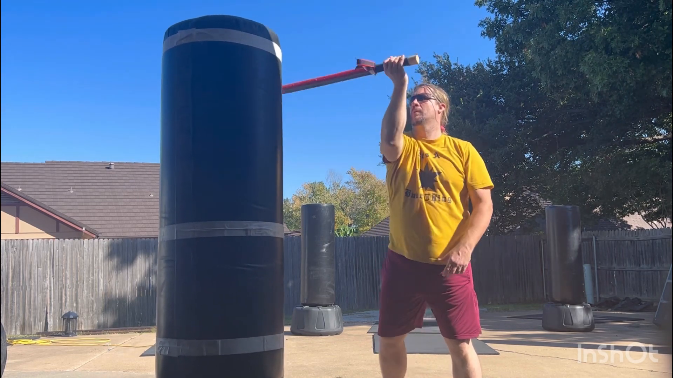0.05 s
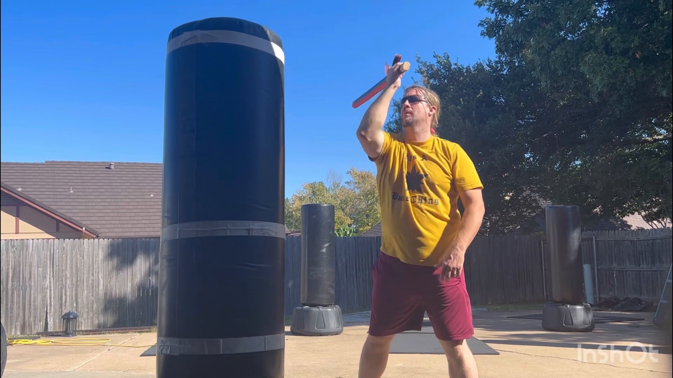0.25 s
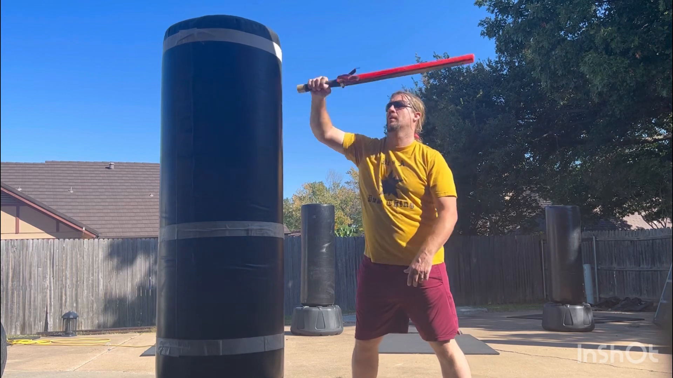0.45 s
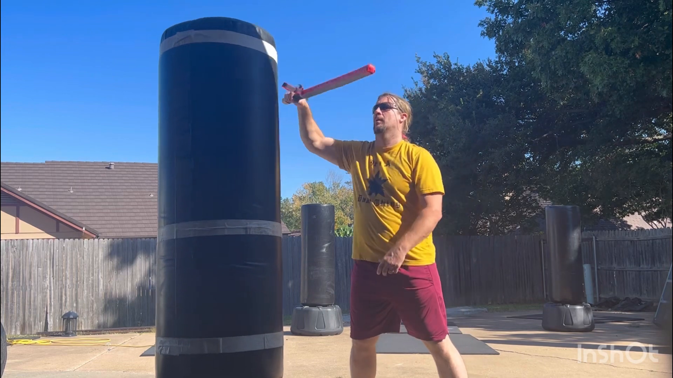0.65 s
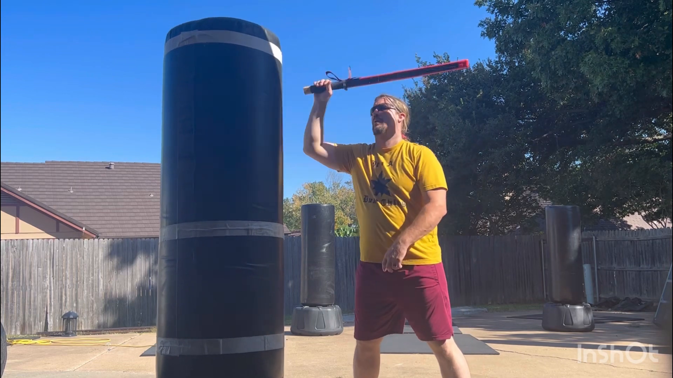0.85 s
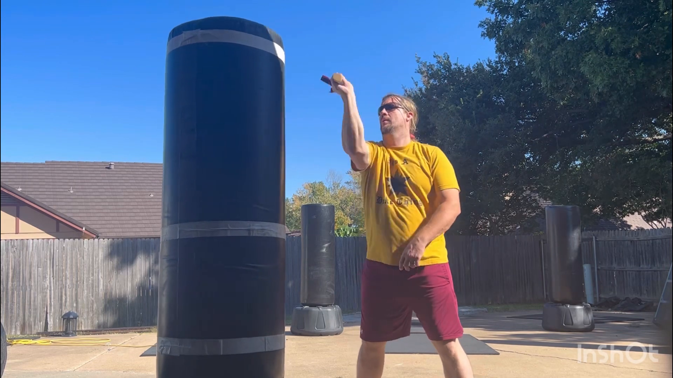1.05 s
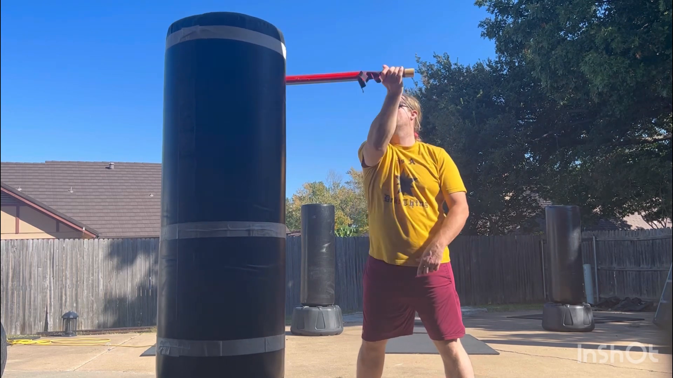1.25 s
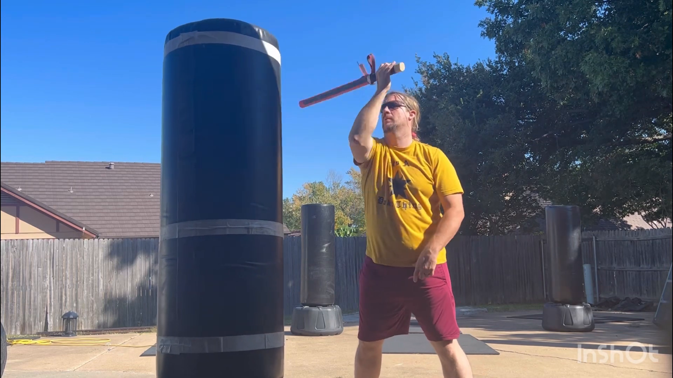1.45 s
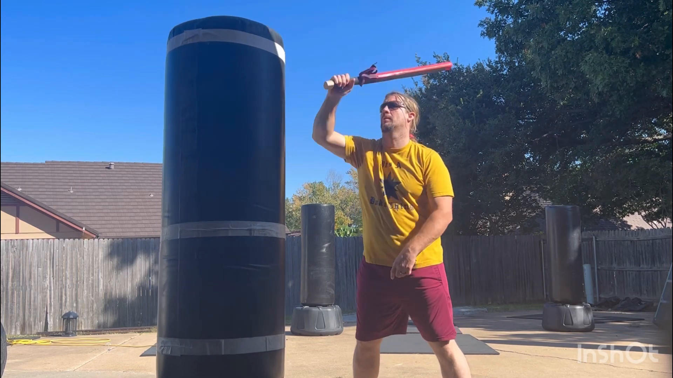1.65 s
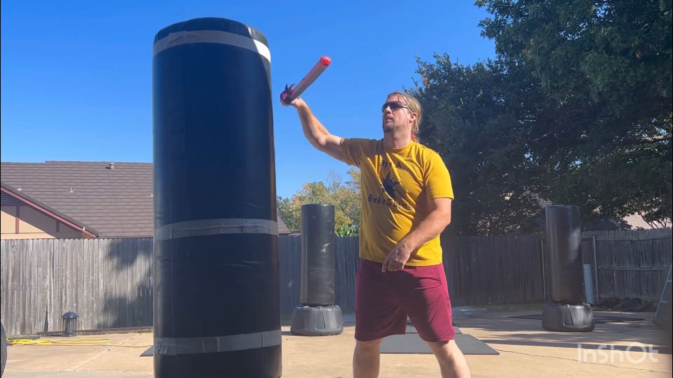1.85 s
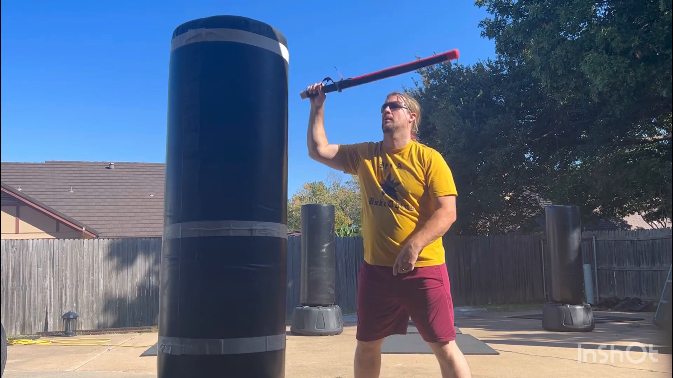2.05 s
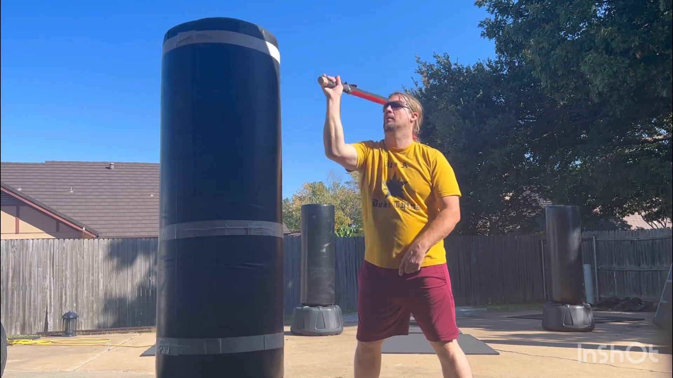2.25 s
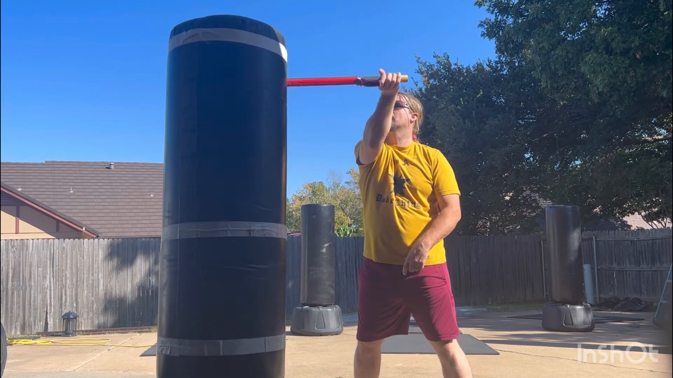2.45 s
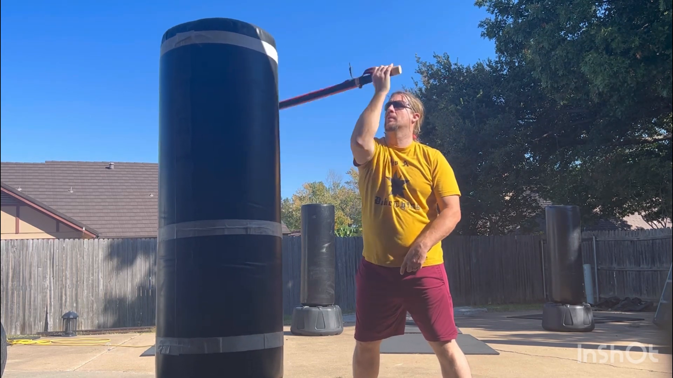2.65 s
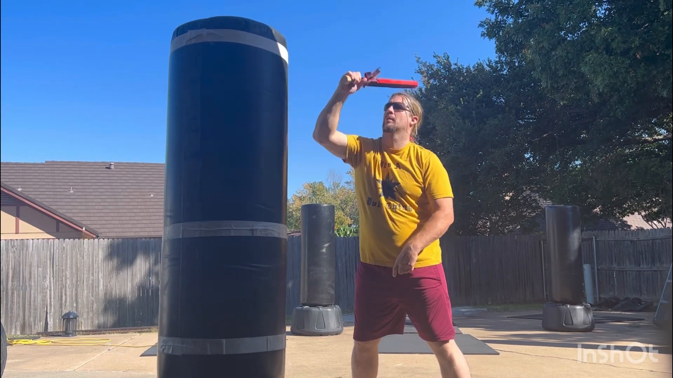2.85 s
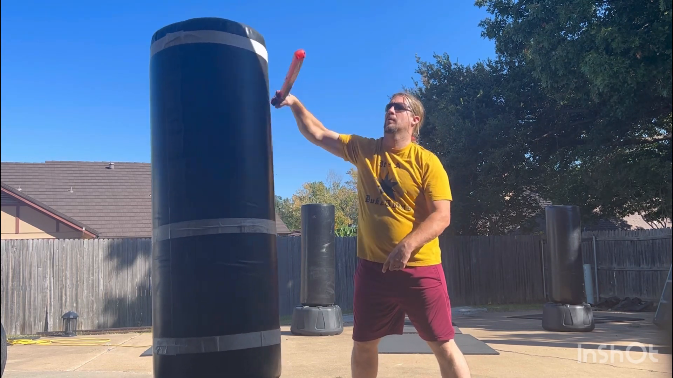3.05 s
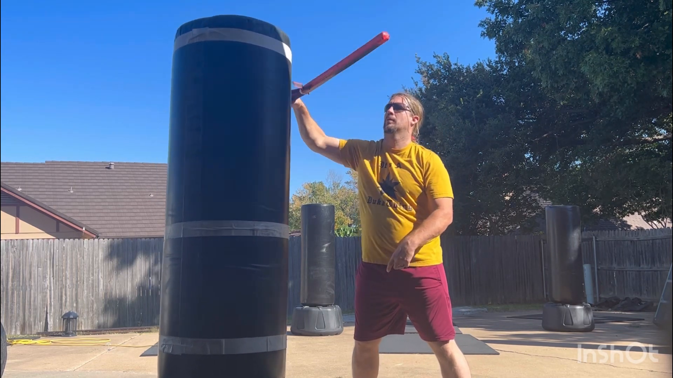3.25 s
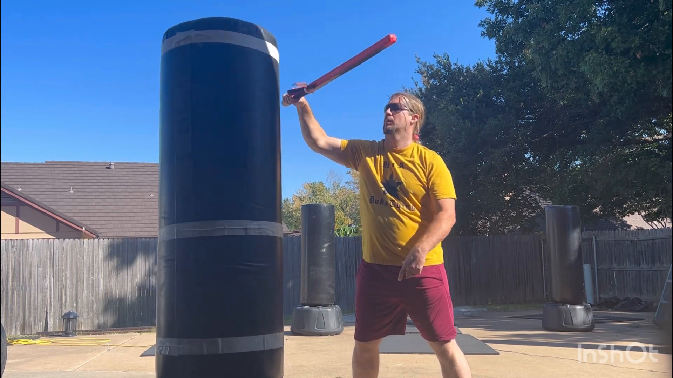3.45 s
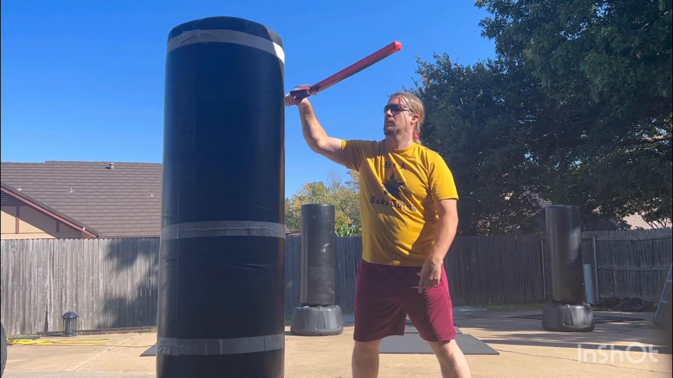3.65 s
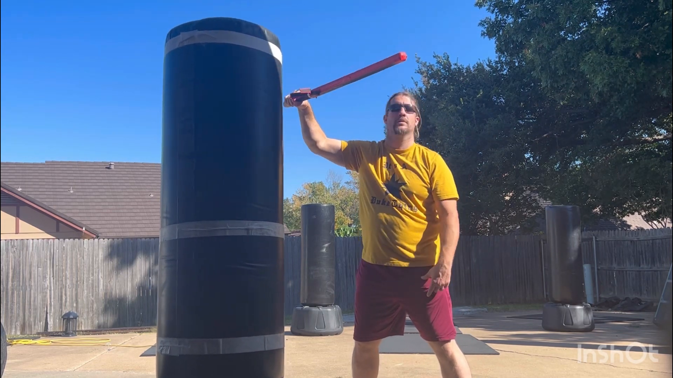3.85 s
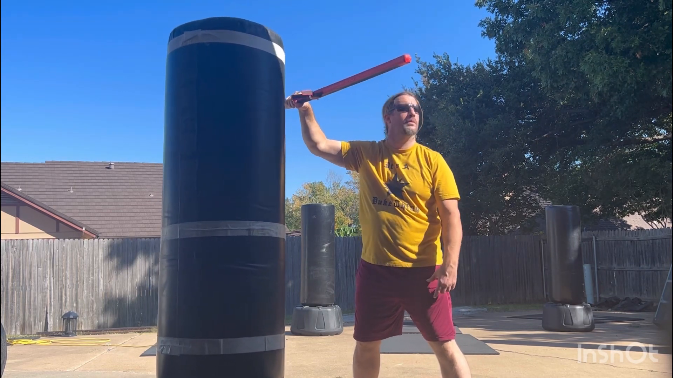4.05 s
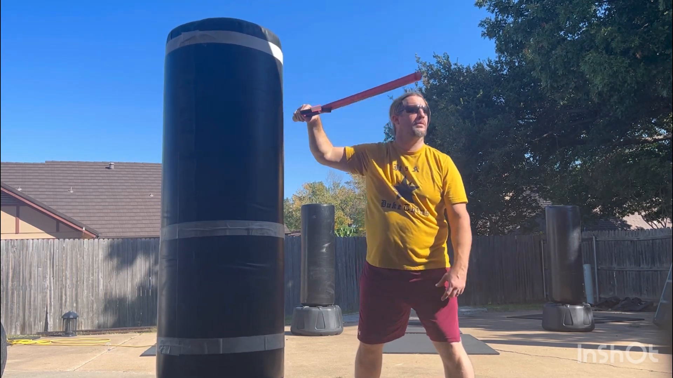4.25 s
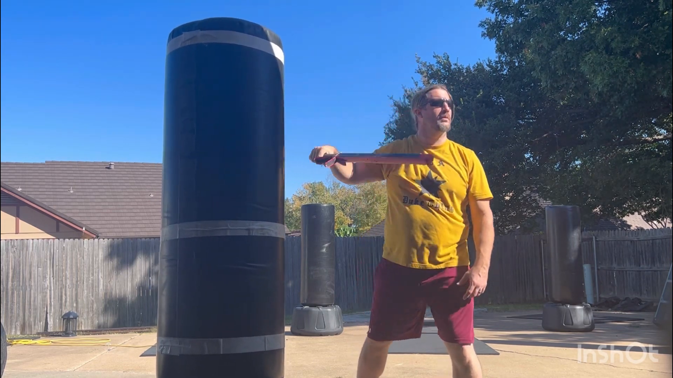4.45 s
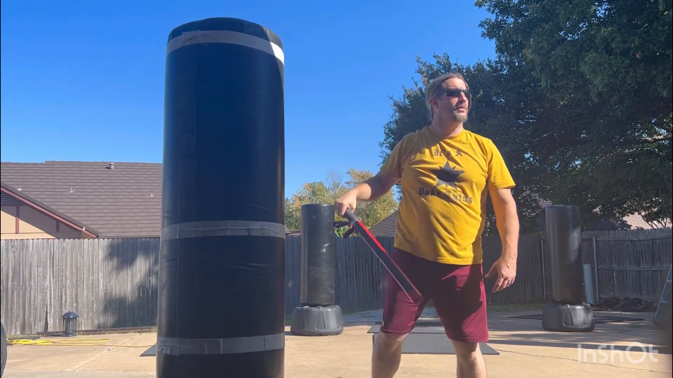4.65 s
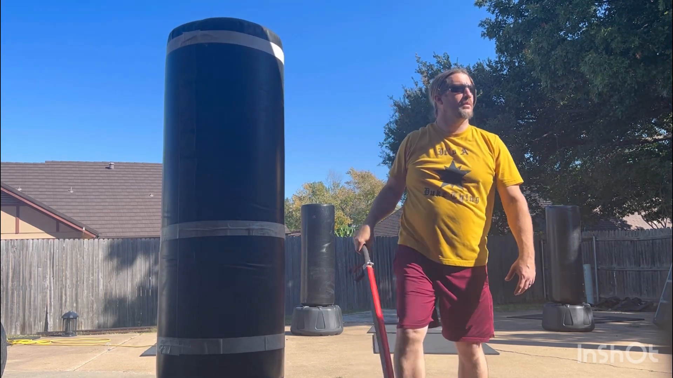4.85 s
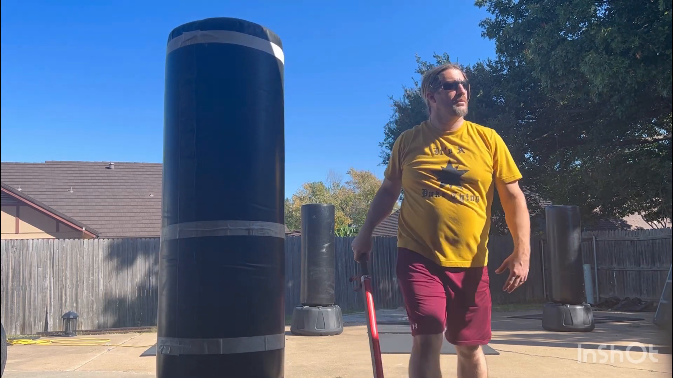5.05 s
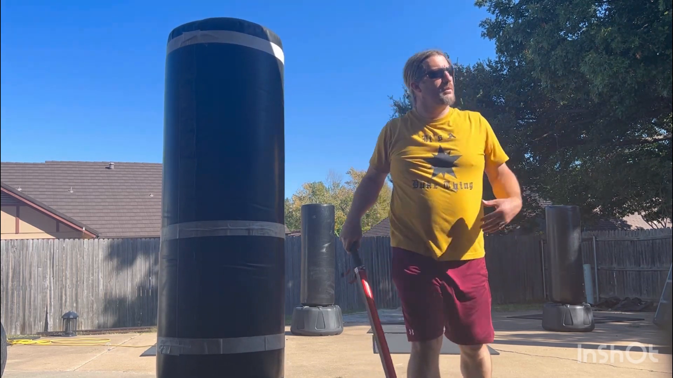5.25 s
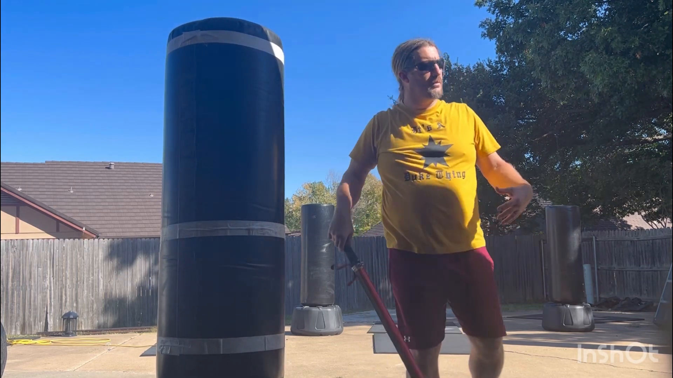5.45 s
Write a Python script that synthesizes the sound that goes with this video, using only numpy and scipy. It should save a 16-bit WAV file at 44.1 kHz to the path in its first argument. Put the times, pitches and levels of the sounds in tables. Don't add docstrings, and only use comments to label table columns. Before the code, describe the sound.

A stick beats a hollow padded post outdoors, sharp flat cracks alternating with duller booming blows, then quiet foot scuffs and faint birds.

```python
import sys
import numpy as np
from scipy import signal
from scipy.fft import rfft, irfft
from scipy.io import wavfile
from scipy.ndimage import uniform_filter1d

SR = 44100
rng = np.random.default_rng(int(sys.argv[2]) if len(sys.argv) > 2 else 0)


def invert_db(x):
    u = np.asarray(x, float) / 20
    return 10 ** u


def generate_wav(sig):
    pcm = np.round(np.clip(np.atleast_2d(sig).T, -1, 1) * 32767).astype(np.int16)
    wavfile.write(sys.argv[1], SR, pcm)


N = 242988
LEAD = SR // 5


def read(points, hz):
    f, value = np.transpose(points)
    return np.interp(np.log(hz + 1), np.log(f + 1), value)


def evened(x):
    return x / np.sqrt(np.mean(x ** 2) + 1e-20)


def add(mix, s, sound):
    part = mix[..., LEAD + round(s * SR):][..., :sound.shape[-1]]
    part += sound[..., :part.shape[-1]]


def resonate(x, hz, width):
    turn = np.exp(2j * np.pi * np.cumsum(hz * np.ones(x.shape[-1])) / SR)
    r = np.exp(-np.pi * width / SR)
    smooth = signal.lfilter([1], np.convolve([1, -r], [1, -r]), x / turn)
    return (turn * smooth).real


def diffuse(pair, colour):
    # f/Hz, likeness (1 = same)
    likeness = [(60, 0.91), (130, .93), (290, 0.6), (640, 0.02), (1410, 0.047), (3100, 0.12), (5600, 0.083)]
    hz = np.fft.rfftfreq(pair.shape[1], 1 / SR)
    a, b = rfft(pair) * invert_db(read(colour, hz))
    same = np.clip(read(likeness, hz), -1, 1)
    right = same * a + np.sqrt(1 - same ** 2) * b
    return evened(irfft([a, right], pair.shape[1]))


def with_ground(x, db):
    out = x.copy()
    lag = round(.00255 * SR)
    out[lag:] += invert_db(db) * x[:-lag]
    return out


def blow(slap_db, drop_hz, crack_db, crack_ms, rings_db, heave_db, heave_hz, trough_ms):
    # f/Hz, level/dB, 60 dB decay/s, rise/ms
    post = [(113, -5, 0.18, 11), (170.15, -5, 0.32, 14), (211.8, -9, 0.067, 7.9), (258.7, -3.5, 0.29, 32),
            (313, -12.5, 0.11, 3), (417, -9, 0.19, 2.7), (526.3, -13.5, 0.17, 7), (600, -16, 0.093, 1.3),
            (912, 0.5, .025, 0.31), (1149, -12, 0.044, .6)]
    t = np.arange(SR // 2) / SR

    burst = rng.standard_normal(len(t)) * np.exp(-(t * 1000 / crack_ms) ** 2)
    stick = evened(resonate(burst, 2600, 3100)) * burst.std()
    crack = with_ground(.9 * burst + .6 * stick, -2.5)

    turns = np.cumsum(315 + drop_hz * np.exp(-t / .0012)) / SR
    slap = np.sin(2 * np.pi * turns) * invert_db(-60 * t / .035)
    slap *= (1 - np.exp(-(t / .0009) ** 2)) * 1.6

    sway = np.cumsum(54 + heave_hz * np.exp(-t / .011)) / SR
    trough = sway[round(trough_ms * SR / 1000)]
    heave = np.cos(2 * np.pi * (sway - trough))
    heave *= np.exp(-(t / 0.026) ** 2) * (1 - np.exp(-(t / 0.0086) ** 2))

    rings = np.zeros(len(t))
    for hz, db, t60, rise_ms in post:
        tone = np.sin(2 * np.pi * hz * rng.uniform(0.96, 1.05) * t)
        rings += invert_db(db - 60 * t / t60) * (1 - np.exp(-t * 1000 / rise_ms)) * tone
    return invert_db(crack_db) * crack - invert_db(slap_db) * slap - invert_db(heave_db) * heave + invert_db(rings_db) * rings


def returns(x):
    # t/s after the blow, level/dB, left minus right/dB
    walls = [(.0505, -15, 1.5), (.0685, -10, -2.5), (.19, -24, 2.5)]
    dull = signal.lfilter(*signal.butter(N=2, Wn=500, fs=SR), x)
    out = np.zeros((2, SR))
    for s, db, lean_db in walls:
        sides_db = db + np.array([[lean_db], [-lean_db]]) / 2
        add(out, s - LEAD / SR, invert_db(sides_db) * dull)
    return out


def yard(db, tilt_db, slower):
    # f/Hz, level/dB per Hz
    colour = [(25, -28.5), (45, 0), (134, -1.5), (263, -1), (369, -8), (530, -9.5), (961, -15.5),
              (2400, -22), (5160, -28), (8000, -31.5), (11500, -38.5), (15500, -38), (16300, -63.5)]
    # f/Hz, 60 dB decay/s
    decay = [(50, 1), (130, 1), (350, 0.87), (920, 0.91), (2430, 0.85), (6400, 0.66), (12000, 0.41)]
    hz, t, z = signal.stft(rng.standard_normal((2, SR)), SR, nperseg=256)
    late = invert_db(-60 * t / slower / read(decay, hz)[:, None])
    patches = uniform_filter1d(rng.standard_normal((len(hz), len(t))), size=24, axis=0)
    lumps = invert_db(1.2 * evened(uniform_filter1d(patches, size=5, axis=1)))
    slope = invert_db(tilt_db * np.log2(np.maximum(hz, 100) / 500))[:, None]
    noise = signal.istft(z * late * lumps * slope, SR, nperseg=256)[1][:, :SR]
    wash = diffuse(noise, colour)
    t = np.arange(SR) / SR
    near = (1 + 1.1 * np.exp(-t / 0.073)) * (1 - np.exp(-(t / 0.0027) ** 2))
    fade_out = np.sqrt(np.clip(9 - 10 * t, 0, 1))
    return invert_db(db - 15) * wash * near * fade_out


def strike(mix, stroke, wash, s, force_db, edge_db, depth_db):
    changed = dict(crack_db=stroke["crack_db"] + edge_db, heave_db=stroke["heave_db"] + depth_db)
    direct = blow(**dict(stroke, **changed))
    both = returns(direct) + yard(**wash) + np.pad(direct, (0, SR - len(direct)))
    add(mix, s, invert_db(force_db) * both)


def knock(db, hz, rise_ms, fall_ms):
    ms = np.arange(2000) * 1000 / SR
    ring = np.sin(2 * np.pi * hz * ms / 1000)
    ring *= (1 - np.exp(-ms / rise_ms)) * np.exp(-(ms / fall_ms) ** 2)
    return -invert_db(db) * with_ground(ring, -4)


def snap():
    return knock(db=-3, hz=2550, rise_ms=.1, fall_ms=.3)


def tick(db, dull_hz, ms):
    fall = np.exp(-np.arange(2000) * 1000 / SR / ms)
    band = signal.butter(N=2, Wn=[500, np.clip(dull_hz, 700, 18000)], btype="band", fs=SR)
    spray = signal.lfilter(*band, rng.standard_normal(len(fall))) * fall
    return invert_db(db - 6) * with_ground(evened(spray) * np.sqrt(np.mean(fall ** 2)), -4)


def rub(length, db, hz, width):
    u = np.linspace(0, 2, round(2 * length * SR))
    pair = rng.standard_normal((2, len(u)))
    pair[1] = pair[0] + 0.34 * pair[1]
    shape = (1 - np.exp(-u / 0.081)) * np.exp(-(u / 0.89) ** 2) * 0.96
    return invert_db(db) * evened(resonate(pair, hz, width)) * shape


def lead_in(mix, s, db):
    add(mix, s - .013, rub(length=.02, db=db, hz=1800, width=3600))


def flat_blows(mix):
    # t/s, force level/dB, extra crack/dB, extra heave/dB
    blows = [
        (0.5249, -1.5, 0.5, 2.5),
        (1.7711, -0.5, 0.5, -0.5),
        (2.9937, -0.04, 3, 1.5),
    ]
    stroke = dict(slap_db=-4, drop_hz=730, crack_db=-9, crack_ms=0.62,
                  rings_db=-9, heave_db=-6.5, heave_hz=50, trough_ms=10.4)
    wash = dict(db=-16.5, tilt_db=0.36, slower=0.99)
    for s, force_db, edge_db, depth_db in blows:
        strike(mix, stroke, wash, s, force_db, edge_db, depth_db)
        add(mix, s + .0004, invert_db(force_db + edge_db / 2) * snap())
        lead_in(mix, s, db=-44)


def back_hand_blows(mix):
    # t/s, force level/dB, extra crack/dB, extra heave/dB
    blows = [
        (-.1, -2, 0.0979, -2),
        (1.1658, -0.0452, 1.5, 0.1),
        (2.4284, -2.5, -0.5, 0.1),
    ]
    stroke = dict(slap_db=-4, drop_hz=300, crack_db=-26, crack_ms=7,
                  rings_db=-16.5, heave_db=-4, heave_hz=190, trough_ms=10)
    wash = dict(db=-18.5, tilt_db=0.3738, slower=0.83)
    for s, force_db, edge_db, depth_db in blows:
        strike(mix, stroke, wash, s, force_db, edge_db, depth_db)
        lead_in(mix, s, db=-53)
        chatter = knock(db=-2.5, hz=850, rise_ms=2.5, fall_ms=3.4)
        chatter += knock(db=-13, hz=1400, rise_ms=1.1, fall_ms=4.5)
        chatter += tick(db=-22, dull_hz=3000, ms=4)
        add(mix, s - .0025, invert_db(2 * force_db) * chatter)
        rebound = tick(db=-12, dull_hz=15000, ms=.8) + invert_db(-11) * snap()
        add(mix, s + .0596, invert_db(2 * force_db) * rebound)


def rocking_post(mix):
    # t/s, length/s, level/dB, grit level/dB
    rocks = [
        (.86, .063, -31, -3),
        (1.5, .075, -36, -8),
        (2.11, .08, -32, 3),
        (2.76, .08, -39, 0.5),
        (3.29, .09, -29, -5),
    ]
    # f/Hz, width/Hz, share of length, level/dB
    base = [(119, 65, 1.0, 0.1255), (290, 230, .75, -8)]
    for s, length, db, grit_db in rocks:
        add(mix, s, rub(.6 * length, db - 15.5 + grit_db, hz=1290, width=800))
        for hz, width, share, rel_db in base:
            add(mix, s, rub(share * length, db + rel_db, hz, width))


def straps_and_grit(mix):
    # t/s, level/dB, f/Hz
    beads = [
        (2.1245, -29, 1500),
        (3.493, -38, 1400),
        (5.2262, -42, 3000),
        (5.257, -54, 3000),
    ]
    # t/s, peak level/dB, dullness f/Hz, length/ms
    ticks = [(.4234, -39, 18000, .6), (1.0884, -48, 14000, 2), (2.1245, -39, 2000, 1.5),
             (2.2628, -52, 3000, 2), (3.493, -41, 2200, 2), (3.6835, -50, 2000, 4), (3.712, -51, 4000, 4),
             (4.157, -46, 12000, 2), (4.44, -56, 9000, 1.5), (4.93, -62, 9000, 2), (5.0145, -54, 8000, 2),
             (5.04, -54, 6000, 2), (5.1098, -53, 8000, 1.5), (5.16, -56, 3000, 2), (5.2259, -41, 6000, .5),
             (5.257, -54, 5000, .8)]
    for s, db, hz in beads:
        add(mix, s, knock(db, hz, rise_ms=.2, fall_ms=.6))
    for s, db, dull_hz, ms in ticks:
        add(mix, s, tick(db, dull_hz, ms))


def feet(mix):
    # t/s, length/s, level/dB, f/Hz
    thuds = [(1.02, .046, -34, 115), (1.08, .045, -36.5, 167), (1.7, .049, -41, 190),
             (2.32, .024, -37, 113), (3.29, .097, -36.5, 70), (3.52, .029, -39.5, 241),
             (3.701, .087, -52.5, 413), (3.72, .051, -36, 145), (4.2, .14, -39.5, 112)]
    # t/s, length/s, level/dB, f/Hz
    scuffs = [(3.497, .041, -54.5, 1276), (3.694, .053, -56.5, 1370), (3.996, .15, -71, 4000),
              (4.051, .32, -67.5, 3000), (4.086, .057, -63, 1800), (4.153, .045, -62, 1770),
              (4.165, .05, -65.5, 11900), (4.529, .036, -67, 4500), (5.019, .054, -64, 4470),
              (5.052, .087, -66.5, 2530), (5.269, .17, -72.5, 5000)]
    for table, share in ((thuds, .62), (scuffs, 1.05)):
        for s, length, db, hz in table:
            add(mix, s, rub(length, db, hz, share * hz))


def bird(length, db, start_hz, end_hz, fuzz_hz):
    u = np.linspace(0, 3, round(3 * length * SR))
    hz = np.interp(u, [0, 1], [start_hz, end_hz])
    blur = evened(resonate(rng.standard_normal((2, len(u))), hz, fuzz_hz))
    clear = np.clip(45 / fuzz_hz, 0, 1.2) * np.sin(2 * np.pi * np.cumsum(hz) / SR)
    shape_db = np.interp(u, [0, .1, .8, 1.1, 3], [-27, -0.5, -3.5, -10, -33])
    return invert_db(db + shape_db) * evened(.6 * blur + 0.24 * blur[::-1] + clear)


def far_birds(mix):
    # t/s, length/s, level/dB, f/Hz
    chirps = [(.3, .12, -68, 2600), (.41, .08, -66, 3000), (1.57, .06, -65, 3100), (1.63, .11, -67, 2280),
              (2.21, .06, -64, 3150), (2.31, .08, -67, 2900), (2.86, .07, -67, 3400),
              (3.86, .12, -66, 3080), (4.24, .07, -71, 3300), (4.29, .05, -74, 2350),
              (4.74, .06, -69, 2600)]
    # t/s, length/s, level/dB, f/Hz
    whistles = [(2.28, .05, -67, 2550), (2.94, .05, -66, 2620), (3.92, .1, -74, 2850),
                (4.07, .03, -71, 2260), (4.1, .05, -64, 2700), (4.145, .11, -70, 2810),
                (4.465, .11, -66, 3030), (4.685, .11, -65, 3040), (4.99, .1, -63, 3380)]
    for table, glide, fuzz_hz in ((chirps, 0.96, 250), (whistles, 1.012, 125)):
        for s, length, db, hz in table:
            add(mix, s, bird(length, db, hz, glide * hz, fuzz_hz))


def insects_and_leaves(mix):
    # t/s, length/s, level/dB, f/Hz
    buzzes = [
        (0, .079, -50.5, 5260),
        (.08, .99, -74, 15100),
        (2.62, .3, -74, 15100),
    ]
    for s, length, db, hz in buzzes:
        add(mix, s, rub(length, db, hz, .085 * hz))


def air():
    # f/Hz, level/dB per Hz
    colour = [(15, -52.5), (28, -29), (45, -7), (65, 4), (85, -3), (118, -3.5), (164, -7.5), (316, -13.5),
              (450, -20.5), (1100, -29), (1800, -42), (3040, -44), (5100, -45.5), (17000, -72)]
    # f/Hz, width/Hz, level/dB
    hums = [(115, 4.3, -53), (197.4, 35, -55.5), (2340, 750, -77.5), (5000, 220, -85)]
    size = N + LEAD
    hz, t, z = signal.stft(rng.standard_normal((2, size)), SR, nperseg=1024)
    patches = uniform_filter1d(rng.standard_normal(z.shape[1:]), size=8, axis=0)
    patches = evened(uniform_filter1d(patches, size=8, axis=1))
    drifting = signal.istft(z * invert_db(2.0 * patches), SR, nperseg=1024)[1][:, :size]
    bed = invert_db(-45) * diffuse(drifting, colour)
    for f, width, db in hums:
        bed += invert_db(db) * evened(resonate(rng.standard_normal(size), f, width))
    return bed


def scene():
    mix = air()
    flat_blows(mix)
    back_hand_blows(mix)
    rocking_post(mix)
    straps_and_grit(mix)
    feet(mix)
    far_birds(mix)
    insects_and_leaves(mix)
    return mix[:, LEAD:]


def top_cut(x):
    return signal.sosfilt(signal.butter(12, 17130, fs=SR, output="sos"), x)


def record(dry):
    # f/Hz, left minus right/dB
    balance = [(60, -0.5), (300, -1.55), (1300, 1.5), (2400, -0.5), (4400, 6), (7000, 1.6)]
    wide = np.pad(dry, ((0, 0), (LEAD, LEAD)), "reflect")
    hz = np.fft.rfftfreq(wide.shape[1], 1 / SR)
    z = rfft(wide)
    top = np.clip((hz - 6500) / 900 + .5, 0, 1)
    late = np.array([np.exp(-2j * np.pi * hz * .00026), np.ones_like(hz)])
    z = np.sqrt(1 - top) * z + np.sqrt(top) * z[0] * late
    sides = invert_db(np.outer([.5, -.5], read(balance, hz)))
    treble_end = np.clip((16800 - hz) / 500, 0, 1)
    x = irfft(z * sides * treble_end, wide.shape[1])[:, LEAD:-LEAD]
    limited = x / (1 + abs(x / .97) ** 4) ** .25
    return top_cut(limited)


dry = scene()
out = record(dry)
generate_wav(out)
```